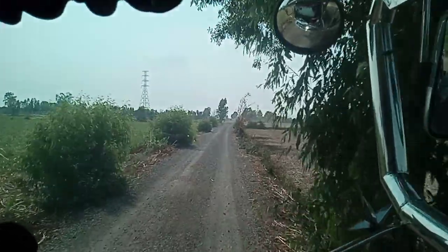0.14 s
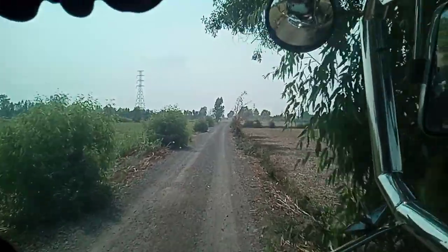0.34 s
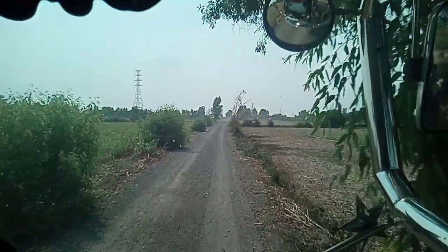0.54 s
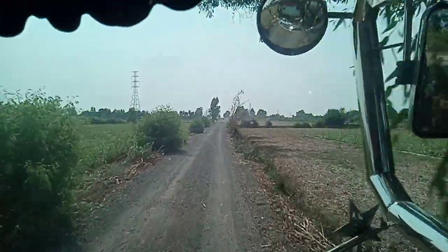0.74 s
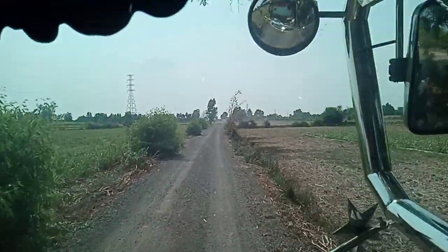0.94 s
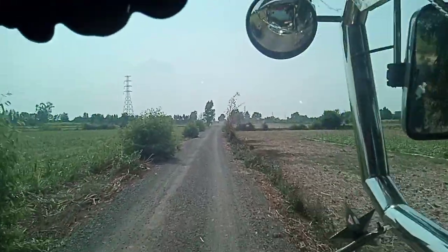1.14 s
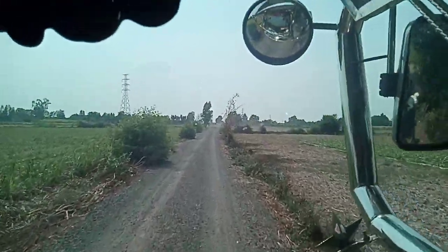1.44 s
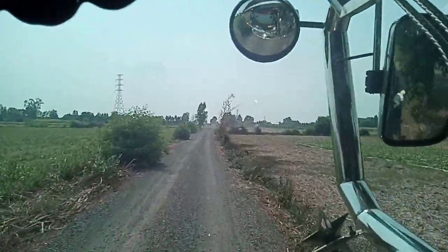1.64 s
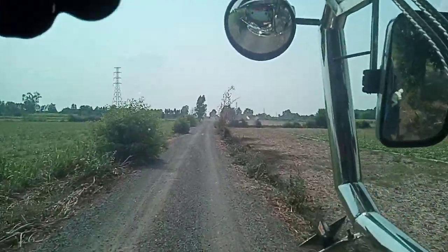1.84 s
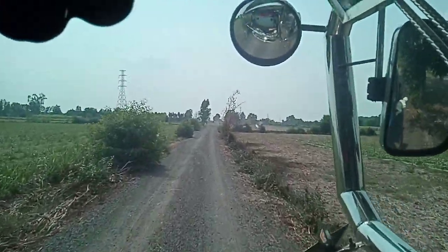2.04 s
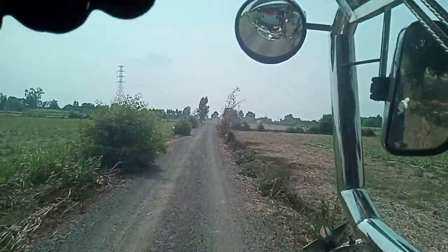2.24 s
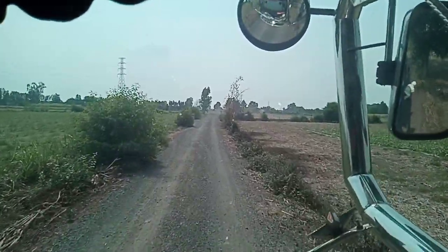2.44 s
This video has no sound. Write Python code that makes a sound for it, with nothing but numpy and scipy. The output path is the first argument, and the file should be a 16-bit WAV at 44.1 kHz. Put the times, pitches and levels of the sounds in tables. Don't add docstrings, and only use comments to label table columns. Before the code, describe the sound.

A heavy diesel truck engine pulls, drops off for a gear change, then pulls again lower

```python
import sys
import numpy as np
from scipy import signal
from scipy.io import wavfile

SR = 44100
rng = np.random.default_rng(int(sys.argv[2]) if len(sys.argv) > 2 else 0)


def voltage_ratio(decibels):
    exponent = np.asarray(decibels, float) / 20
    return 10 ** exponent


def dump(signal):
    limited = np.clip(np.atleast_2d(signal).T, -1, 1)
    pcm = np.round(limited * 32767).astype(np.int16)
    wavfile.write(sys.argv[1], SR, pcm)


N = 114660


def at_hz(points, hz):
    point_hz, point_db = np.array(points).T
    return np.interp(np.log(hz), np.log(point_hz), point_db)


def rms_one(x):
    return x / np.sqrt(np.mean(x ** 2) + 1e-20)


def in_time(rows):
    start_s, *columns = np.transpose(rows)
    return [np.interp(np.arange(N) / SR, start_s, column) for column in columns]


def gate(rows, fade_s):
    t = np.arange(N) / SR
    inside_s = np.minimum(t - rows[0][0], rows[-1][0] - t)
    return np.clip(inside_s / fade_s + 1, 0, 1)


def drift(rate_hz):
    r = np.exp(-80 * np.pi * rate_hz / SR)
    white = rng.standard_normal(N // 40 + 2002)
    slow = signal.lfilter([1], [1, -2 * r, r * r], white)[2000:]
    return np.interp(np.arange(N) / 40, np.arange(len(slow)), slow / slow.std())


def ring(x, hz, t60_s):
    r, w = voltage_ratio(-60 / (t60_s * SR)), 2 * np.pi * hz / SR
    return signal.lfilter([0, np.sin(w)], [1, -2 * r * np.cos(w), r * r], x + 1e-18)


def ring_twice(x, hz, t60_s):
    return ring(ring(x, hz, t60_s), hz, t60_s)


def dull(x, hz):
    return signal.sosfilt(signal.butter(10, hz, fs=SR, output="sos"), x)


def banded_noise(spectrum, low_hz, high_hz, patchy_db, count):
    out, together = 0, drift(18.0)
    edges = np.geomspace(low_hz, high_hz, count)
    white = rng.standard_normal((2, N))
    for k, (lo, hi) in enumerate(zip(edges, edges[1:])):
        sos = signal.butter(2, [lo, hi], "band", fs=SR, output="sos")
        band = signal.sosfilt(sos, white[k % 2])
        flicker_db = patchy_db * (1.14 * together + drift(10.0))
        out = out + band * voltage_ratio(at_hz(spectrum, np.sqrt(lo * hi)) + flicker_db)
    return rms_one(out)


def struck(events, modes, contact_s, bounce_s, trim_db, favours_pitch=False):
    out, span = np.zeros(N + SR), int(.3 * SR)
    t = np.arange(span) / SR
    bounce = 0.19 * (t > bounce_s) * np.exp(-np.abs(t - bounce_s) / contact_s)
    force = np.exp(-t / contact_s) + bounce
    for start_s, level_db, *pitch_hz in events:
        bursts = rng.standard_normal((len(modes), span)) * force
        scale = pitch_hz[0] if pitch_hz and not favours_pitch else 1
        hit = 0
        for burst, (mode, mode_db, t60_s) in zip(bursts, modes):
            if favours_pitch:
                mode_db = mode_db - 16 * abs(np.log2(mode / pitch_hz[0]))
            hit = hit + voltage_ratio(mode_db) * ring(burst, mode * scale, np.clip(t60_s, .005, .25))
        i = int(start_s * SR)
        out[i:i + span] += voltage_ratio(level_db + trim_db) * hit / np.abs(hit).max()
    return out[:N]


# start_s, firing_hz, level_db
FIRST_PULL = [
    (0, 54.85, -10.5),
    (.1, 54.9, -7),
    (.25, 56.2, -7.5),
    (.45, 56.82, -8.5),
    (.565, 56.84, -10),
    (.6, 55.8, -14.5),
    (.625, 57.5, -27),
    (.67, 60.7, -18.5),
    (.7, 56.7, -50),
]
# multiple of firing rate, level_db, drift_db_per_s
FIRST_ORDERS = [(1, -27.5, -11), (2, 1.5, 5.5), (3, -7, -5), (4, -20.5, 18.5), (5, -17, -11.5),
                (6, -40, -20.5), (7, -35, 6.5), (8, -40.5, -22)]
# start_s, firing_hz, level_db
SECOND_PULL = [
    (1.8, 32, -37.5),
    (1.95, 35.06, -28.5),
    (2.06, 38.12, -14.5),
    (2.18, 36.85, -17),
    (2.33, 38.44, -11.5),
    (2.43, 40.83, -22),
    (2.48, 39.38, -12.5),
    (2.6, 41, -19.5),
]
# multiple of firing rate, level_db, drift_db_per_s
SECOND_ORDERS = [(1, -30, 0.5), (2, -20, -2), (3, 0.5, -2.5), (4, -18.5, 17.5), (5, -31, -1),
                 (6, -20.5, 28), (7, -26, -11.5), (8, -22, -3.5)]


def pull_drone(pull, orders, wobble_db, lag):
    firing_hz, level_db = in_time(pull)
    phase = 2 * np.pi * np.cumsum(firing_hz) / SR
    from_middle_s = (np.arange(N) / SR - (pull[0][0] + pull[-1][0]) / 2).clip(-.4, .4)
    out = 0
    for k, order_db, slope in orders:
        unsteady_db = wobble_db * np.sqrt(abs(order_db) / 10 + 0.033) * drift(6.0)
        height = voltage_ratio(order_db + slope * from_middle_s + unsteady_db)
        out = out + height * np.sin(k * phase + lag * k * k)
    return np.sqrt(2) * voltage_ratio(level_db) * gate(pull, 0.011) * out


def engine():
    first = pull_drone(FIRST_PULL, FIRST_ORDERS, wobble_db=1.15, lag=-0.593)
    second = pull_drone(SECOND_PULL, SECOND_ORDERS, wobble_db=2.0, lag=-0.5944)
    return first + second


# pitch_hz, width_hz, level_db
CAB_MODES = [(86.7, 7.1, -8.5), (113.7, 13, -10), (173.3, 10, -3.5), (228.1, 5.1, -15), (280, 100, -2.5)]


def boom(shake_db):
    bumps_per_s = 86
    bumps = (rng.random(N) < bumps_per_s / SR) * rng.uniform(-1, 1, N) * 14
    push = bumps + rng.standard_normal(N)
    out = 0
    for k, (hz, width_hz, level_db) in enumerate(CAB_MODES):
        out = out + (-1) ** k * voltage_ratio(level_db) * rms_one(ring_twice(push, hz, 1.2 / width_hz))
    return voltage_ratio(shake_db + 3.0) * out / 2


# start_s, level_db (peak), pitch_hz
POTHOLES = [(0.642, -19, 114.4), (0.8, -19.5, 126.3), (0.956, -19.5, 293), (1.172, -8, 95.5),
            (1.261, -14.5, 153), (1.581, -12, 116.8), (1.646, -11, 90), (1.685, -11.5, 155),
            (1.861, -7, 99), (1.992, -11, 141), (2.384, -7, 169.9)]


def thuds():
    out, t = np.zeros(N + SR), np.arange(int(.25 * SR)) / SR
    for start_s, level_db, hz in POTHOLES:
        swing = np.minimum(t / 0.0092, 1) * np.exp(-t * hz / 4.5) * np.sin(2 * np.pi * hz * t)
        i = int(start_s * SR)
        out[i:i + len(t)] += voltage_ratio(level_db) * swing
    return out[:N]


# start_s, level_db (peak), pitch_hz
TRIM_KNOCKS = [(.129, -33, 900), (.160, -17, 880), (.319, -24, 950), (.525, -32, 720), (.978, -24, 850),
               (1.021, -22, 1050), (1.124, -24, 1000), (1.151, -23, 770), (1.293, -15, 720),
               (1.312, -26, 750), (1.419, -27, 1300), (1.58, -31, 1170), (1.772, -26, 1000),
               (1.784, -15, 900), (1.791, -19, 1080), (1.799, -23, 820), (1.885, -29, 800),
               (2.267, -30, 690), (2.512, -30, 680)]
# ratio to the knock's pitch, level_db, t60_s
PANEL_MODES = [(.82, -5, .03), (1.0, 0, .035), (1.15, -3, .035), (1.5, -9, .025), (2.2, -15, .02)]


def trim_knocks():
    return dull(struck(TRIM_KNOCKS, PANEL_MODES, 0.00081, 0.0052, trim_db=1.5), 3000)


# start_s, level_db (peak)
LEVER_CLANKS = [
    (.785, -22),
    (.789, -21.5),
    (.798, -27.5),
]
# start_s, level_db (peak)
SOFT_TOUCHES = [
    (.845, -40.5),
    (1.629, -24),
]
# pitch_hz, level_db, t60_s
LEVER_MODES = [(1700, -7, .04), (2020, -4, .05), (2330, -1, .05), (2500, 0, .045), (2710, 0, .055),
               (3400, -15, .05), (3930, -6, .06), (4743, -7, .05), (5370, -19, .07), (6300, -21, .04),
               (7280, -31, .25), (8140, -27, .07), (8760, -27, .16), (5910, -36, .25)]
# pitch_hz, level_db, t60_s
COLLAR_MODES = [(7558, -3, .07), (10630, -5, .16), (10770, -7, .11), (11020, -7, .22), (11290, -3, .066),
                (12050, -12, .05), (14100, -14, .035), (14600, -13, .04), (15060, -14, .06)]
# start_s, level_db (peak)
COLLAR_TOUCH = [
    (1.793, -54),
]
# pitch_hz, level_db, t60_s
COLLAR_TOUCH_MODE = [(7270, 0, .06)]


def lever():
    clank = dull(struck(LEVER_CLANKS, LEVER_MODES, 0.00082, 0.0016, trim_db=2.5), 8600)
    collar = struck(LEVER_CLANKS, COLLAR_MODES, 0.00066, 0.0077, trim_db=-27.0)
    touch = struck(COLLAR_TOUCH, COLLAR_TOUCH_MODE, .001, .004, trim_db=1.5)
    soft = struck(SOFT_TOUCHES, LEVER_MODES[3:8], 0.0012, 0.0035, trim_db=-4.0)
    return clank + collar + touch + soft


# start_s, level_db (peak), pitch_hz (favoured)
METAL_TICKS = [(.05, -49, 4500), (.266, -41.5, 4700), (.285, -50, 6100), (.437, -43, 4700),
               (.654, -54, 5500), (.785, -28, 4000), (.797, -35, 4000), (1.019, -30, 3000),
               (1.107, -44, 7500), (1.108, -34, 3000), (1.152, -42, 5000), (1.307, -55.5, 6100),
               (1.372, -50, 6300), (1.549, -48, 6100), (1.628, -38, 4000), (1.688, -47, 5000),
               (1.77, -48, 2500), (1.948, -59, 6100), (1.985, -55, 6100), (2.186, -62.5, 4500),
               (2.289, -60, 7000), (2.323, -47, 5500), (2.402, -57, 5500), (2.457, -55, 6100),
               (2.506, -42, 4000), (2.558, -54, 6500)]
# pitch_hz, level_db, t60_s
METAL_MODES = [(2300, 1, 0.033), (3080, 8, 0.0092), (3940, 8, .01), (4690, -2, 0.0088), (5500, -14, 0.0027),
               (6300, -7.5, .01), (7420, -10.5, 0.005), (8550, -6, 0.008)]


def metal_ticks():
    ticks = struck(METAL_TICKS, METAL_MODES, 0.0064, 0.0082, trim_db=3.5, favours_pitch=True)
    return dull(ticks, 8600)


def grit():
    touches_per_s = 60
    born = (rng.random(N) < touches_per_s / SR) * voltage_ratio(4.8 * rng.exponential(1, N).clip(0, 1.8))
    decay = np.exp(-1 / (0.0038 * SR))
    burst = signal.lfilter([1], [1, -decay], born) * rng.standard_normal(N)
    rung = sum(voltage_ratio(level_db - 24) * ring(burst, hz, t60_s) for hz, level_db, t60_s in METAL_MODES[3:])
    return dull(voltage_ratio(-66) * rung, 8600)


MOUNT_HZ = 2750
# start_s, level_db (peak)
MOUNT_SQUEAKS = [(.002, -42), (0.171, -39.5), (0.1935, -45), (0.246, -45), (0.436, -45), (0.484, -43),
                 (0.519, -45.5), (0.849, -40.5), (0.985, -44.5), (1.26, -44.5), (1.368, -42.5),
                 (1.468, -46), (1.978, -43), (2.425, -50), (0.652, -42.5), (0.925, -42), (1.0334, -36.5),
                 (1.076, -41.5), (1.2225, -38.5), (1.2755, -39.5), (1.427, -43.5), (1.564, -40),
                 (1.6008, -37), (1.6474, -37), (1.7014, -41), (1.833, -40.5), (1.8911, -40.5), (1.93, -35),
                 (1.965, -46), (2.008, -35), (2.06, -38.5), (2.1144, -36.5), (2.164, -36.5), (2.2523, -36),
                 (2.3036, -34.5), (2.3501, -40.5), (2.388, -35.5), (2.4486, -41), (2.4775, -42.5),
                 (2.494, -40), (2.55, -41.5), (2.575, -39.5)]


def squeaks():
    length_s, lead_s, drop_hz = .024, .005, 170
    out, t = np.zeros(N + SR), np.arange(int(length_s * SR)) / SR
    chance = rng.standard_normal((len(MOUNT_SQUEAKS), 2))
    for (start_s, level_db), (detune, dent) in zip(MOUNT_SQUEAKS, chance):
        hz = MOUNT_HZ + 15 * detune + drop_hz * np.exp(-t / 0.0048)
        progress = np.minimum(t / length_s * (1 + .3 * abs(dent)), 1)
        stutter = 1 + .4 * np.cos(2 * np.pi * 130 * t + dent)
        shape = np.sin(np.pi * progress ** .8) * stutter
        i = max(int((start_s - lead_s) * SR), 0)
        out[i:i + len(t)] += voltage_ratio(level_db - 1.5) * shape * np.sin(2 * np.pi * np.cumsum(hz) / SR)
    return out[:N]


def rub():
    level = voltage_ratio(-60 + 3.5 * drift(25.0))
    whistle = ring_twice(rng.standard_normal(N), MOUNT_HZ, .008)
    return level * rms_one(whistle)


# start_s, pitch_hz, level_db
SEAT_CREAK = [
    (1.44, 2190, -46),
    (1.47, 2170, -43.5),
    (1.49, 2050, -37.5),
    (1.505, 1747, -37.5),
    (1.52, 1824, -33),
    (1.535, 1720, -45),
]


def creak():
    hz, level_db = in_time(SEAT_CREAK)
    level = voltage_ratio(level_db - 1.5 + 2.2 * drift(80.0))
    phase = 2 * np.pi * np.cumsum(hz + 15 * drift(73.0)) / SR
    return np.sqrt(2) * level * gate(SEAT_CREAK, .008) * np.sin(phase)


# start_s, level_db (peak), pitch_hz
BRACKET_CHIRPS = [(.024, -43, 2030), (.7203, -46, 2100), (.7657, -43, 2000), (.893, -51.5, 2160),
                  (1.002, -47.5, 2030), (1.0784, -53, 2080), (1.233, -48, 1980), (1.3718, -48.5, 2160),
                  (1.706, -43, 2100), (1.7903, -40, 2130), (2.262, -52.5, 2010), (2.2988, -47, 2140),
                  (2.5296, -43.5, 1960)]
BRACKET_HARMONICS = [-5, 0, -18, -27]


def chirps():
    length_s = .02
    out, t = np.zeros(N + SR), np.arange(int(length_s * SR)) / SR
    shape = np.sin(np.pi * (t / length_s) ** 0.25)
    for (start_s, level_db, hz), dent in zip(BRACKET_CHIRPS, rng.standard_normal(len(BRACKET_CHIRPS))):
        phase = 2 * np.pi * hz * t + .15 * np.sin(2 * np.pi * 150 * t + dent)
        tone = sum(voltage_ratio(db) * np.sin((k + 1) * phase) for k, db in enumerate(BRACKET_HARMONICS))
        i = int(start_s * SR)
        out[i:i + len(t)] += voltage_ratio(level_db - 0.5) * shape * tone
    return out[:N]


# pitch_hz, level_db (per Hz)
CAB_SPECTRUM = [(25, -27), (90, 0.5), (127, 2.5), (512, -24.5), (843, -21), (1250, -30), (2720, -38),
                (4490, -48.5)]


def cab_rumble(shake_db):
    level_db = -26 + 4.0 + 0.28 * (shake_db - shake_db.mean())
    noise = banded_noise(CAB_SPECTRUM, 25.8, 4436, patchy_db=1.2, count=24)
    return dull(voltage_ratio(level_db) * noise, 4300)


# pitch_hz, level_db (per Hz)
AIR_SPECTRUM = [(4700, -1.5), (5800, -6), (8500, -8.5), (10000, -14), (15500, -19.5)]


def air():
    load = gate(FIRST_PULL[:6], .05)
    return voltage_ratio(-74 + 1.5 * load) * banded_noise(AIR_SPECTRUM, 3500, 12000, patchy_db=.5, count=8)


def mic_hiss():
    load = gate(FIRST_PULL[:6], .04)
    return voltage_ratio(-86.5 + 3.5 * load) * rng.standard_normal(N)


# start_s, level_db
ROAD_SHAKE = [(0, -24.5), (.5, -31), (.72, -36.5), (.93, -46.5), (1.15, -25), (1.35, -34), (1.55, -36),
              (1.75, -24), (1.95, -28.5), (2.3, -32.5), (2.6, -27.5)]


def scene():
    shake_db, = in_time(ROAD_SHAKE)
    motor = engine()
    background = cab_rumble(shake_db) + air() + mic_hiss()
    rattles = trim_knocks() + metal_ticks() + grit() + lever()
    slips = squeaks() + creak() + chirps() + rub()
    road = boom(shake_db) + thuds()
    return (road - motor + rattles + slips + background)[None]


def top_cut(x):
    return signal.sosfilt(signal.butter(12, 15650, fs=SR, output="sos"), x)


def record(dry):
    loud = 1.275 * np.tanh(dry / 1.488)
    return top_cut(loud)


dry = scene()
out = record(dry)
dump(out)
```